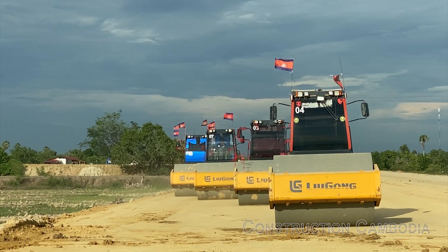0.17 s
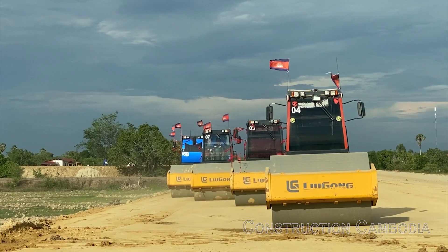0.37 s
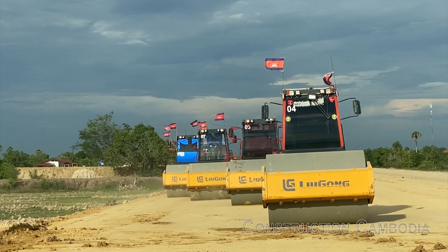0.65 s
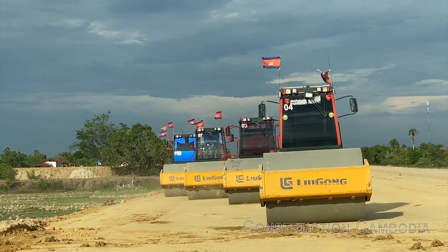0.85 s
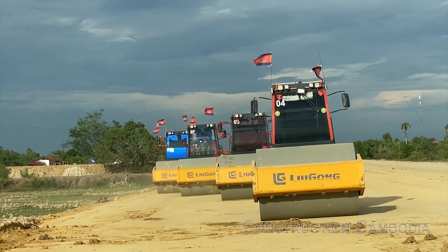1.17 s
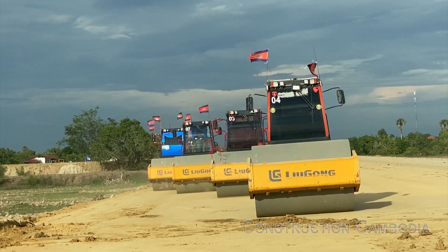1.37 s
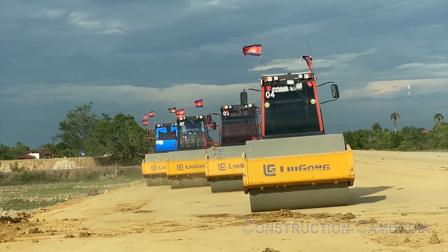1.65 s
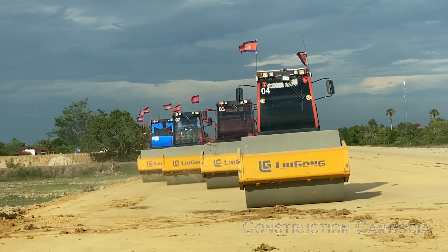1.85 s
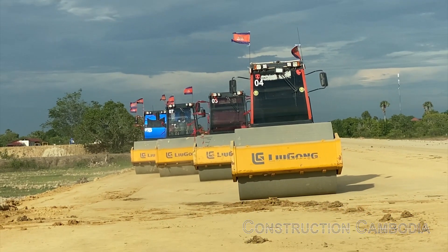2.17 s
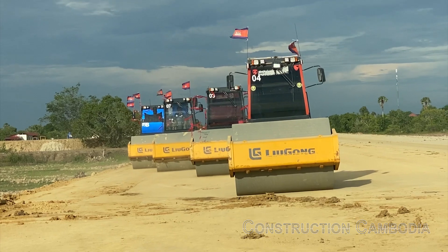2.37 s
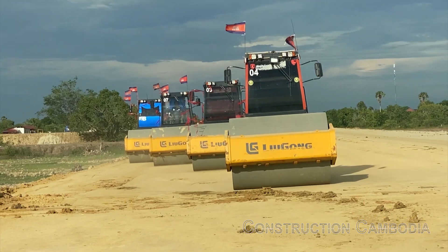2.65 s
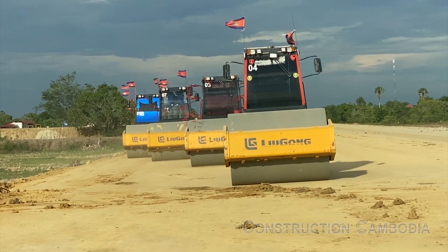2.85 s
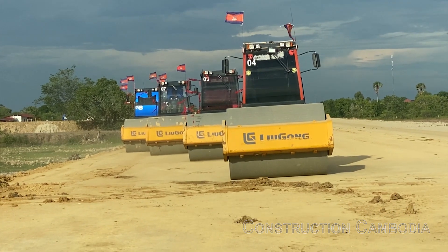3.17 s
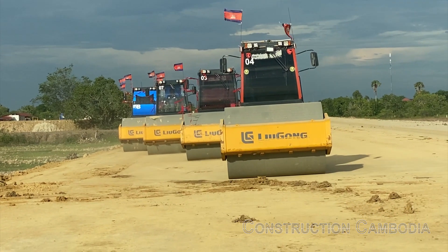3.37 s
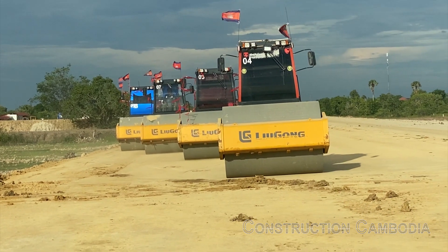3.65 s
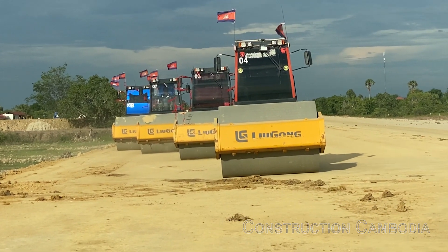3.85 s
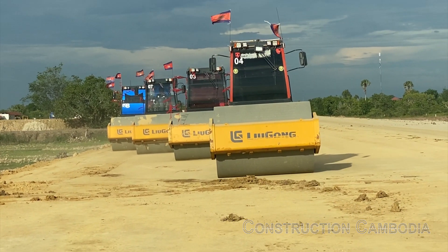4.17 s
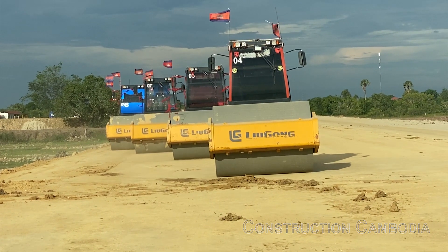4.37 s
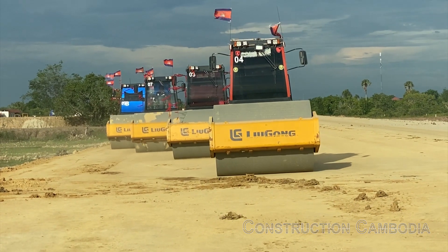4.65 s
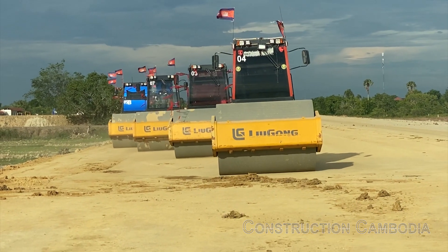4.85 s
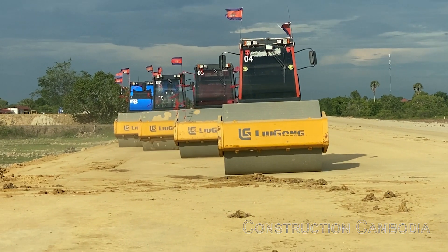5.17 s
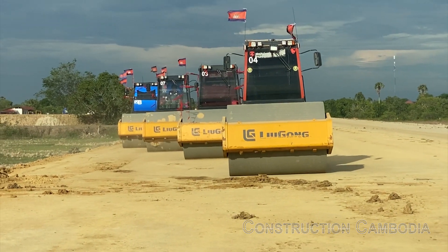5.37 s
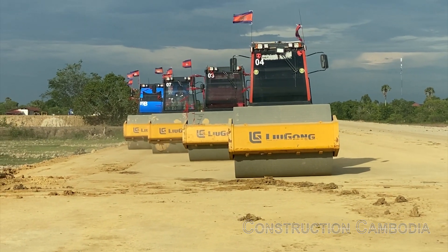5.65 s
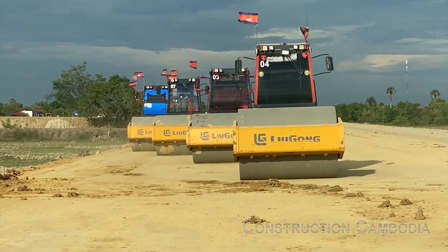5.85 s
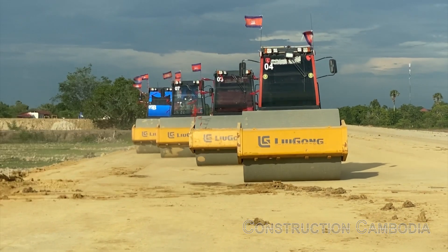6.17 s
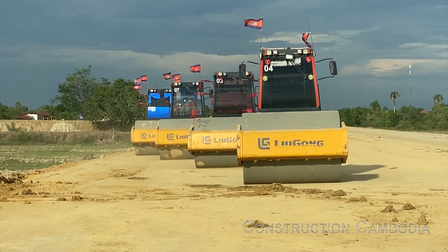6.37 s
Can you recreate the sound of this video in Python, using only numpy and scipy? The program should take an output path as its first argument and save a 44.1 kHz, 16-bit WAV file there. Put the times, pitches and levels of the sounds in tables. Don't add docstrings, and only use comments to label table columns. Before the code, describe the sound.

A line of heavy road rollers rumbles steadily outdoors, deep tones slowly beating, while loose grit nearby crunches, ticks and knocks at intervals.

```python
import sys
import numpy as np
from scipy import signal
from scipy.fft import rfft, irfft
from scipy.io import wavfile
from scipy.ndimage import uniform_filter1d

SR = 44100
rng = np.random.default_rng(int(sys.argv[2]) if len(sys.argv) > 2 else 0)


def master_out(mix):
    frames = np.transpose(np.atleast_2d(mix))
    ceiling = np.clip(frames, -1, 1)
    pcm = np.round(ceiling * 32767).astype(np.int16)
    wavfile.write(sys.argv[1], SR, pcm)


def voltage_ratio(decibels):
    exponent = np.asarray(decibels, float) / 20
    return 10 ** exponent


N = 287532


def evened(x):
    return x / np.sqrt(np.mean(x ** 2) + 1e-20)


def read(points, hz):
    table_hz, value = np.transpose(points)
    return np.interp(np.log(hz + 1), np.log(table_hz + 1), value)


def drift(rate_hz):
    t = np.arange(0, N, 256) / SR
    speeds = rate_hz * rng.uniform(.1, 1, 12)
    slow = sum(np.sin(2 * np.pi * (f * t + rng.random())) for f in speeds)
    return np.interp(np.arange(N) / SR, t, evened(slow))


def colour(x, points, below_db=-24):
    hz = np.fft.rfftfreq(512, 1 / SR)
    octaves_under = np.maximum(np.log2(points[0][0] / (hz + 1)), 0)
    response = voltage_ratio(read(points, hz) + below_db * octaves_under)
    taps = np.roll(irfft(response), 256) * np.hanning(512)
    return signal.oaconvolve(x, taps[None] / np.linalg.norm(taps), "same")


def tone(hz, db):
    turns = np.cumsum(hz * np.ones(N)) / SR + rng.random()
    return np.sqrt(2) * voltage_ratio(db) * np.sin(2 * np.pi * turns)


# [pitch_hz, level_db per Hz]
AIR = [(3000, -0.5), (4200, -10.5), (5500, -11), (6350, -11.5), (6650, -5), (7000, -23.5), (8000, -17),
       (9500, -13.5), (11500, -31), (12500, -40.5), (15000, -43)]
AIR_DB = -71.5


def hiss():
    return voltage_ratio(AIR_DB + 1.8 * drift(15)) * colour(rng.standard_normal((1, N)), AIR)


# [time_s, pitch_hz, level_db rms]
CHIRP = [
    (1.0, 1860, -85),
    (1.015, 2020, -62),
    (1.041, 2230, -61),
    (1.065, 2470, -63),
    (1.082, 2750, -57),
    (1.092, 2480, -59),
    (1.105, 2500, -85),
]


def chirp():
    time_s, pitch_hz, level_db = np.transpose(CHIRP)
    t = np.arange(N) / SR
    level = np.interp(t, time_s, level_db, -140, -140) + 3.5 * drift(60) - 5
    return tone(np.interp(t, time_s, pitch_hz), level)


# [pitch_hz, level_db per Hz]
GRIT = [(3000, -6.5), (4000, -3), (4700, -2.5), (6500, -4.5), (8500, -3), (10500, -11.5), (12000, -15.5),
        (14000, -14), (15500, -10.5)]
# [pitch_hz, level_db per Hz]
FINES = [(8500, 0), (10500, -3), (12000, -3.5), (14000, -1.5), (15500, -8)]
# [middle_s, half_length_s, grit_db rms, fines_above_grit_db]
STROKES = [(.3, .3, -88.5, -5), (0.874, .06, -76, -7), (1.05, 0.065, -67.5, -6), (1.23, .14, -74, -8),
           (1.8, .04, -62.5, 4), (1.858, .05, -62, -2), (2.222, 0.13, -72, -7), (2.381, 0.1, -71, -2.5),
           (2.677, .16, -75, -1), (2.837, 0.084, -64, -0.8), (3.062, 0.063, -64.5, -5),
           (3.355, .05, -60, -10.5), (3.418, .05, -65, -8), (3.487, 0.073, -58, -6),
           (3.65, 0.07, -69, -8.5), (4.072, 0.17, -72, 1), (4.255, 0.045, -74, -13), (4.5, 0.2, -79, -2.5),
           (4.69, .05, -70.5, -9.5), (4.934, .016, -55, -6), (5.012, .022, -56, -7),
           (5.15, .1, -71.5, -1.5), (5.358, .08, -72, -8.5), (5.68, .04, -77, 0),
           (5.814, 0.054, -67.5, -4.5), (6.0, .1, -77, -12.5)]
STROKE_FALL_DB, STROKE_EDGE, STROKE_RISE = 9.5, 1.2, 1
REST_DB, REST_FINES_DB = -83.5, -91


def scuffs():
    middle_s, half_s, grit_db, fines_db = np.transpose(STROKES)[:, :, None]
    t = np.arange(0, N, 64) / SR
    reach = abs((t - middle_s) / half_s * np.where(t < middle_s, STROKE_RISE, 1))
    coarse_db = grit_db - STROKE_FALL_DB * reach ** STROKE_EDGE
    layers = [(coarse_db, REST_DB, 1.5, GRIT), (coarse_db + fines_db, REST_FINES_DB, -2.5, FINES)]
    out = np.zeros(N)
    for stroke_db, rest_db, lift_db, grain in layers:
        size = voltage_ratio(2.3 * np.minimum(rng.exponential(1, N), 5))
        happens = rng.random(N) < 7000 / SR
        clicks = evened(size * happens * rng.choice([-1., 1.], N))
        strength = np.sqrt((voltage_ratio(stroke_db) ** 2).sum(0) + voltage_ratio(rest_db) ** 2)
        level = np.interp(np.arange(N) / SR, t, strength)
        clumps = voltage_ratio(lift_db + 2.9 * drift(70))
        out += colour(clicks[None] * level * clumps, grain)[0]
    return out


# [start_s, peak_db, crunch_db]
SNAPS = [(0.7472, -45, -55), (1.7726, -52, -59.5), (1.7792, -43, -56.5), (2.2094, -55.5, -54.5),
         (2.2527, -57, -64.5), (2.789, -55, -57), (2.8458, -54.5, -56), (3.0097, -58, -53.5),
         (3.058, -52, -54.5), (3.0718, -48.5, -56.5), (3.123, -55, -59.5), (3.2715, -55, -62),
         (3.3213, -51.5, -57), (3.3308, -53, -55), (3.3442, -53, -53.5), (3.3646, -53, -64.5),
         (3.3953, -49.5, -67), (3.414, -50.5, -54.5), (3.492, -35.5, -55.5), (3.5044, -49, -53),
         (3.514, -43.5, -53), (3.64, -55, -53.5), (4.5928, -40, -34.5), (4.8816, -69, -53.5),
         (5.1616, -53, -54), (5.245, -55.5, -56), (5.3465, -57.5, -52), (5.7716, -40.5, -53.5),
         (5.7868, -64, -59.5), (5.813, -47, -55)]
# [start_s, gap_s, peak_db, crunch_db, change_db per snap]
ROLLS = [
    (1.796, .0189, -53, -55.5, 3),
    (3.4355, .0112, -52, -53.5, 2.5),
    (4.9145, 0.0067, -43.5, -43.5, -2.1),
    (4.99, 0.0079, -40, -40, -2.7),
]
# [pitch_hz, level_db per Hz]
BODY = [(1700, 0), (3300, -4), (4200, -26)]


def snaps():
    t = np.arange(4000) / SR
    spray, crunch = np.zeros((2, N))
    attack = np.minimum(t / .0003, 1)
    stones = list(SNAPS)
    for start_s, gap_s, db, crunch_db, change_db in ROLLS:
        stones += [(start_s + k * gap_s, db + k * change_db, crunch_db + k * change_db) for k in range(4)]
    for start_s, db, crunch_db in stones:
        at = slice(round(start_s * SR), round(start_s * SR) + 4000)
        spray_noise, crunch_noise = rng.standard_normal((2, 4000))
        spray[at] += voltage_ratio(db - 5.5 - 60 * t / 0.039) * attack * spray_noise
        crunch_db += 0.95 * min(crunch_db + 53.0, 0)
        crunch[at] += voltage_ratio(min(crunch_db, -46) - 2.0 - 60 * t / 0.086) * attack * crunch_noise
    return colour(spray[None], GRIT)[0] + colour(crunch[None], BODY)[0]


# [start_s, peak_db, pitch_hz]
PEBBLES = [(1.8153, -49, 5450), (1.8564, -44, 6450), (3.0579, -50, 5510), (3.1233, -58, 4960),
           (3.1344, -56, 4510), (3.2715, -54, 5130), (3.3044, -57, 5160), (3.3204, -54, 4370),
           (3.3323, -45, 4950), (3.3434, -51, 4430), (3.353, -49, 4520), (3.3654, -49, 5200),
           (3.3774, -52, 4870), (3.3962, -52, 4480), (3.4034, -52, 4550), (3.4146, -46, 4760),
           (3.4224, -48, 5180), (3.4354, -45, 5490), (3.4448, -42, 5130), (3.454, -42, 5100),
           (3.4624, -45, 5110), (3.4695, -54, 4280), (3.4695, -40, 5270), (3.6406, -59, 4920),
           (3.6544, -55, 5460)]
PEBBLE_T60, PEBBLE_DB, PEBBLE_SPREAD = 0.031, -6.5, .18


def pebbles():
    t, out = np.arange(2000) / SR, np.zeros(N)
    for start_s, db, hz in PEBBLES:
        spread, turn = rng.uniform(-1, 1, (2, 6, 1))
        mode_hz = hz * (1 + PEBBLE_SPREAD * spread)
        ring = np.sin(2 * np.pi * (mode_hz * t + turn)).sum(0) / np.sqrt(3)
        fade = voltage_ratio(db + PEBBLE_DB - 60 * t / PEBBLE_T60)
        out[round(start_s * SR):][:2000] += fade * np.minimum(t * hz / 3, 1) * ring
    return out


# [start_s, peak_db, pitch_hz, ring_time_s
# to fall 60 dB]
KNOCKS = [(1.821, -49, 1500, 0.065), (1.855, -43, 2800, .02), (2.788, -46, 3000, .02),
          (4.5935, -28, 2736, 0.028), (4.5932, -28, 3030, 0.012), (4.5937, -36, 3600, 0.022),
          (4.596, -41, 2490, 0.045), (4.5945, -27, 937, 0.031), (4.609, -45, 3000, .03),
          (4.597, -42.5, 2400, .04), (4.915, -45, 4950, .015), (4.915, -43.5, 7600, .012),
          (4.991, -46.5, 4900, .025), (4.8806, -45, 2670, .025), (4.8806, -45.5, 3100, .025),
          (4.914, -34, 2640, 0.021), (4.922, -42, 2650, .02), (4.929, -44, 2750, .02),
          (4.9315, -46, 4900, .03), (4.936, -42, 2600, .025), (4.927, -33, 800, 0.053),
          (4.936, -32, 635, 0.039), (4.99, -29, 2630, 0.012), (4.997, -38, 2600, 0.03),
          (5.019, -43, 2540, .025), (4.999, -40, 1165, 0.033), (5.005, -30, 930, 0.032),
          (4.997, -26, 274, 0.11), (5.0, -30, 430, 0.098)]


def knocks():
    t, out = np.arange(6000) / SR, np.zeros(N)
    for start_s, db, hz, t60 in KNOCKS:
        fade = voltage_ratio(db - 60 * t / t60)
        out[round(start_s * SR):][:6000] += fade * np.minimum(t * hz / 2, 1) * np.sin(2 * np.pi * hz * t)
    return out


# [pitch_hz, level_db per Hz]
ROAR = [(15, -19), (45, -9.5), (100, 1.5), (140, -4), (200, -2), (280, -8), (450, -13.5), (600, -17),
        (950, -23), (1300, -33), (1600, -30.5), (2100, -39.5), (2800, -39.5), (4000, -49.5)]
ROAR_DB = -36
# [pitch_hz, likeness 0 to 1]
SAME = [(60, 0.99), (125, 0.98), (300, 0.56), (700, .6), (1200, 0.21), (1900, 0.31), (2300, 0.92),
        (4500, 0.72)]
# [pitch_hz, left_minus_right_db]
LEAN = [(60, -1.5), (150, -4), (380, 2), (950, 1), (2380, -0.5), (5980, -1), (15000, 2.5)]
# [pitch_hz, width_hz, first_db, last_db]
CASINGS = [(428, 13, 4, 7.5), (548, 11, 5.5, 5), (683, 34, 5, 2), (877, 110, 3, 2.5), (928, 40, 0.5, 5.5),
           (1113, 37, -0.5, 7), (1555, 34, 4, 3.5), (1960, 140, 4.5, -0.5), (2260, 190, 1, 6),
           (3100, 80, -2, 2), (3470, 35, 9.5, -8.5)]


def roar():
    frames, hz = N // 512 + 5, np.fft.rfftfreq(2048, 1 / SR)
    a, b, c, d, patches = rng.standard_normal((frames, 1025, 5)).T
    patches = uniform_filter1d(patches, size=4, axis=0)
    patches = evened(uniform_filter1d(patches, size=6, axis=1))
    same = np.clip(read(SAME, hz), -1, 1)[:, None]
    left = a + 1j * b
    right = same * left + np.sqrt(1 - same ** 2) * (c + 1j * d)
    shape_db = read(ROAR, hz) - 30 * np.maximum(np.log2((hz + 1) / ROAR[-1][0]), 0)
    lean_db = np.array([.5, -.5])[:, None] * read(LEAN, hz)
    lift_db = 0
    for casing_hz, width_hz, *ends_db in CASINGS:
        bump = np.exp(-.5 * ((hz - casing_hz) / width_hz) ** 2)
        lift_db = lift_db + np.outer(bump, np.linspace(*ends_db, frames))
    z = np.array([left, right]) * voltage_ratio((shape_db + lean_db)[:, :, None] + lift_db + 1.82 * patches)
    sound = signal.istft(z, nperseg=2048, noverlap=1536)[1][:, 512:N + 512]
    return evened(sound) * voltage_ratio(ROAR_DB)


def turning(hz, drift_hz, stroke_s, levels, first):
    t = np.arange(N) / SR - stroke_s
    turn = 2 * np.pi * (hz * t + .5 * drift_hz * t ** 2)
    *orders_db, swell_db = levels
    orders = (voltage_ratio(db + swell_db * t) * np.cos(k * turn) for k, db in enumerate(orders_db, first))
    return np.sqrt(2) * sum(orders)


# [speed_hz, drift_hz per s, firing_stroke_s]
ENGINES = [(16.57, -.0353, 3.2702), (16.8073, -.0045, 3.2259), (16.8936, -.0046, 3.2662),
           (15.9579, .0051, 3.2754)]
# [second_db, third_db, fourth_db, swell_db per s]
ENGINE_DB = [(-30.5, -32, -27, 0.5), (-34, -39, -30.5, 0.63), (-38, -64, -35, 1.2),
             (-34, -70, -36.5, -0.43)]
# [speed_hz, drift_hz per s, down_stroke_s]
WEIGHTS = [(26.691, -.003, 3.2577), (53.34, .032, 3.2529), (73.567, -.001, 3.255), (78.796, .008, 3.2615),
           (80.023, -.033, 3.2619), (80.477, .07, 3.2552), (82.854, -.156, 3.2572), (50.176, .043, 3.2669)]
# [level_db, swell_db per s]
WEIGHT_DB = [(-35, -0.3), (-44.5, 0), (-32.5, -0.5), (-42.5, 0.5), (-36.5, 1), (-40, 1.5), (-40, -0.2),
             (-45, -1.9)]
# [pitch_hz, level_db rms, waver_db]
HUMS = [(107.5, -50.5, 0.5), (120.4, -58, 2), (133.6, -51.5, 2), (195, -51.5, 0.5), (190.4, -54.5, 4.5),
        (221.3, -57.5, -0.7), (293.8, -60.5, 0.5)]
ORDERS_DB = -49.5


def drums():
    engines = sum(turning(*row, db, 2) for row, db in zip(ENGINES, ENGINE_DB))
    weights = sum(turning(*row, db, 1) for row, db in zip(WEIGHTS, WEIGHT_DB))
    hums = sum(tone(hz * (1 + 0.0019 * drift(0.97)), db + waver_db * drift(1.2)) for hz, db, waver_db in HUMS)
    steady_hz = WEIGHTS[0][0]
    speed = steady_hz * (1 + 0.00095 * drift(0.99))
    orders = np.zeros(N)
    for k in range(8, 26):
        orders += tone(k * speed, ORDERS_DB + read(ROAR, k * steady_hz) + 3.1 * drift(3))
    sides = voltage_ratio(np.array([[-.15], [.15]]))
    return (engines + weights + hums + orders) * sides


def scene():
    near = scuffs() + snaps() + knocks() + pebbles()
    scatter = rng.standard_normal((2, 600)) * voltage_ratio(-60 * np.arange(600) / SR / 0.036)
    scattered = signal.oaconvolve(near[None], scatter / np.linalg.norm(scatter[0]))[:, :N]
    ground = near + voltage_ratio(-17) * scattered
    return hiss() + chirp() + ground + roar() + drums()


# [pitch_hz, right_leads_turns]
PORTS = [(20, .012), (200, .012), (2000, .01), (3000, -.06), (4300, -.05), (4900, 0), (6700, 0), (8500, .5),
         (9900, 1), (10300, 1), (12100, 1.5), (13700, 2), (14400, 2), (15800, 2.5)]


def ports(dry):
    padded = np.pad(dry, ((0, 0), (2048, 2048)), "reflect", reflect_type="odd")
    padded *= signal.windows.tukey(N + 4096, 4096 / N)
    table_hz, turns = np.transpose(PORTS)
    lead = np.interp(np.fft.rfftfreq(N + 4096, 1 / SR), table_hz, turns)
    shift = np.exp(1j * np.pi * np.outer([-1, 1], lead))
    return irfft(rfft(padded) * shift, N + 4096)[:, 2048:N + 2048]


GATE_HZ, GATE_DB = 12300, -107


def gate(x):
    padded = np.pad(x, ((0, 0), (0, 2048)), "reflect", reflect_type="odd")
    hz, _, z = signal.stft(padded, SR, nperseg=1024)
    power = uniform_filter1d((abs(z) ** 2).mean(0), size=30, axis=0)
    power = uniform_filter1d(power, size=3, axis=1)
    shut = (power < voltage_ratio(GATE_DB) ** 2) & (hz > GATE_HZ)[:, None]
    return signal.istft(z * ~shut, SR, nperseg=1024)[1][:, :N]


def band_limit(x):
    return signal.sosfilt(signal.butter(12, 15960, fs=SR, output="sos"), x)


def record(dry):
    opening = np.minimum(np.arange(N) / SR / 0.0016, 1) ** 2
    return band_limit(gate(ports(dry) * opening))


dry = scene()
out = record(dry)
master_out(out)
```